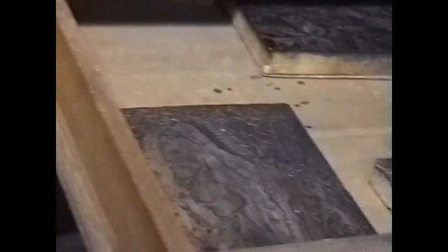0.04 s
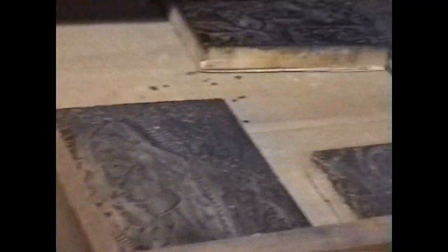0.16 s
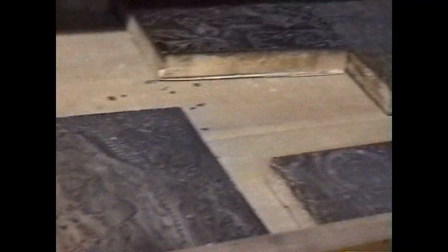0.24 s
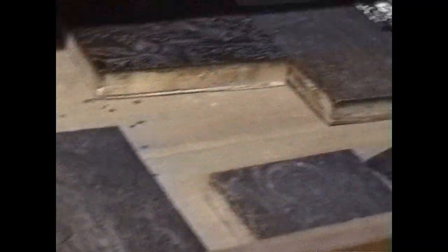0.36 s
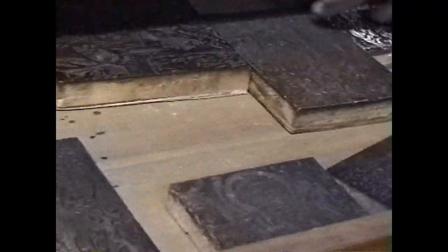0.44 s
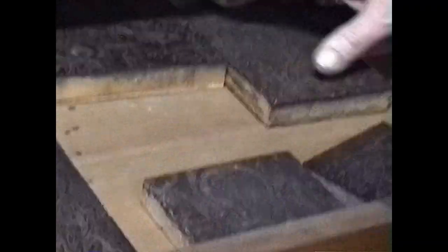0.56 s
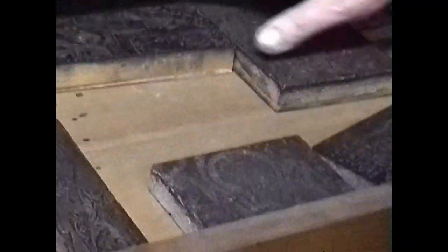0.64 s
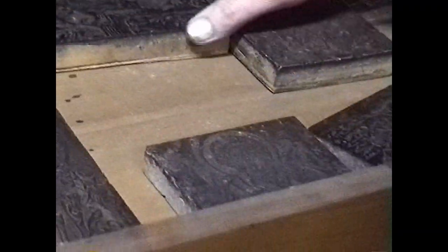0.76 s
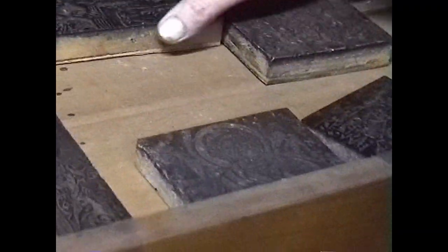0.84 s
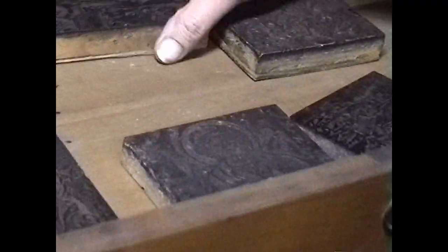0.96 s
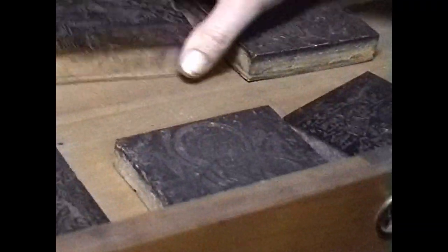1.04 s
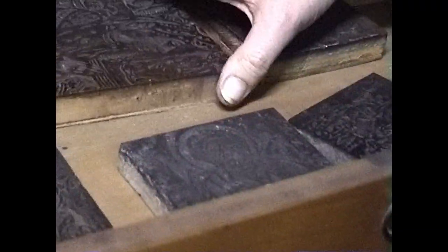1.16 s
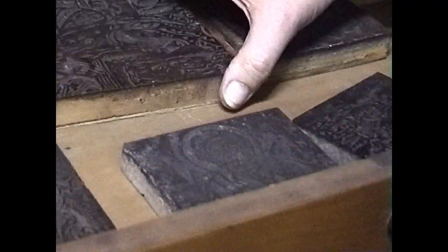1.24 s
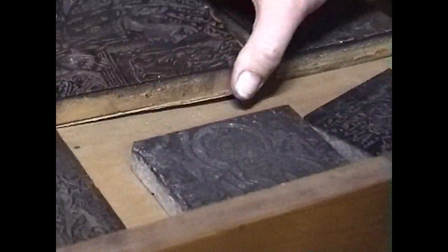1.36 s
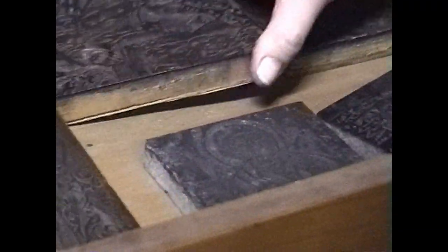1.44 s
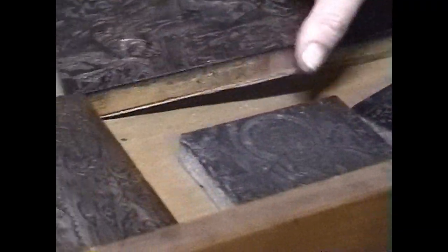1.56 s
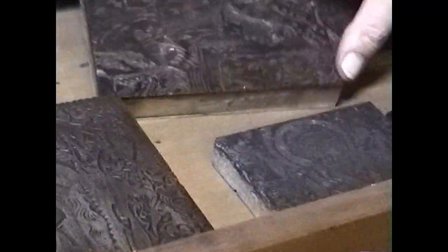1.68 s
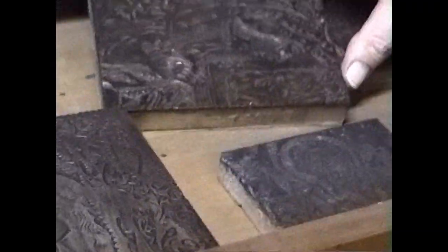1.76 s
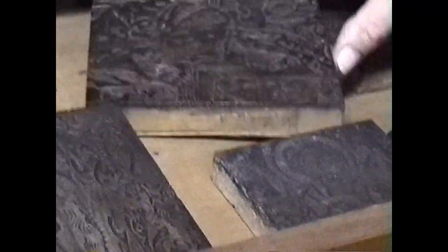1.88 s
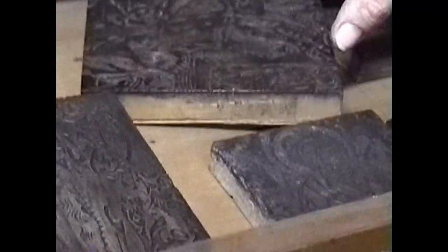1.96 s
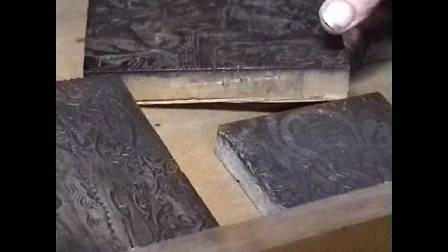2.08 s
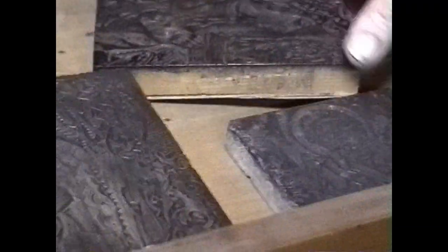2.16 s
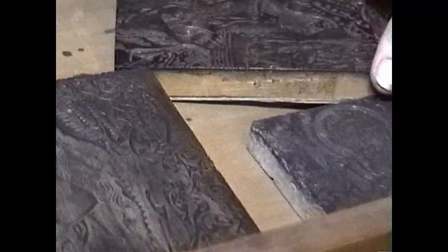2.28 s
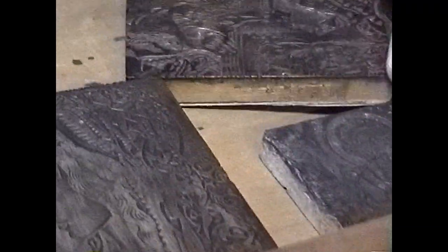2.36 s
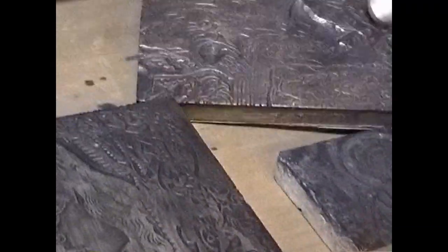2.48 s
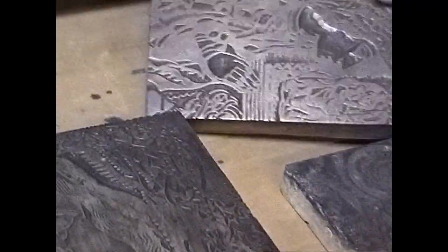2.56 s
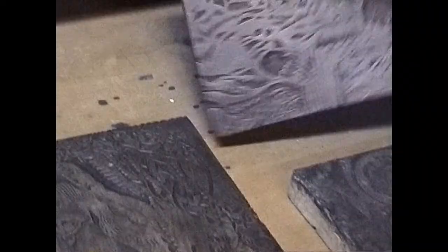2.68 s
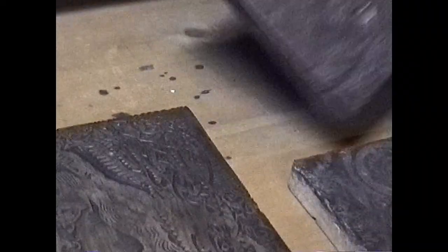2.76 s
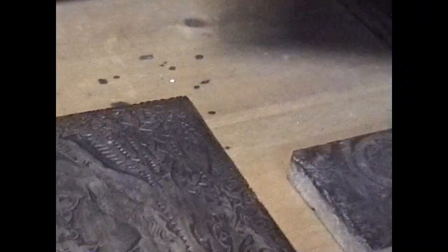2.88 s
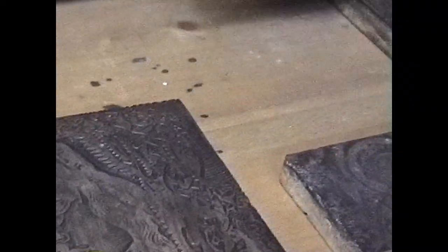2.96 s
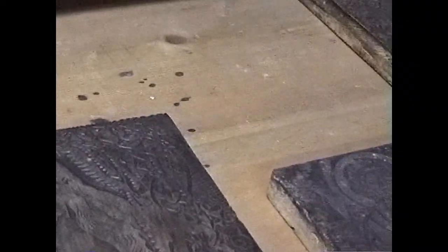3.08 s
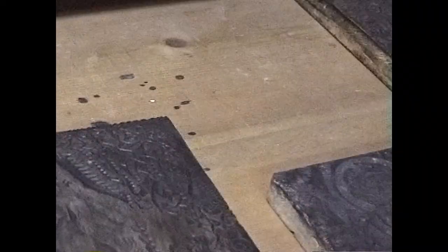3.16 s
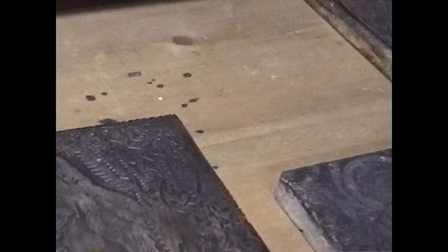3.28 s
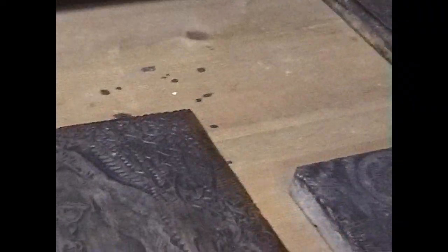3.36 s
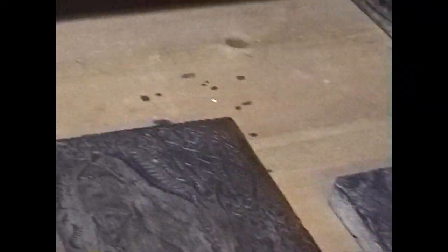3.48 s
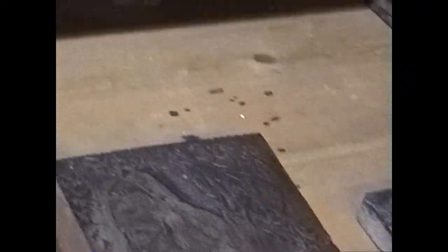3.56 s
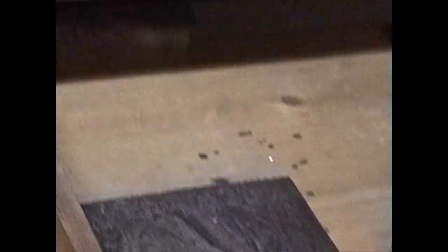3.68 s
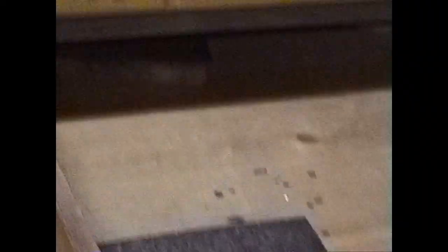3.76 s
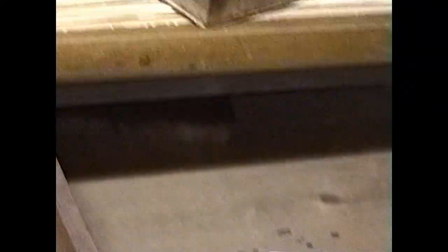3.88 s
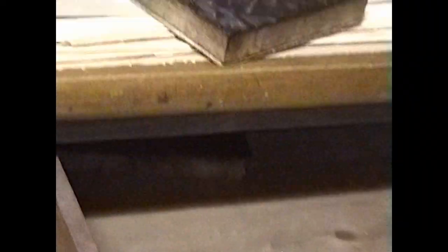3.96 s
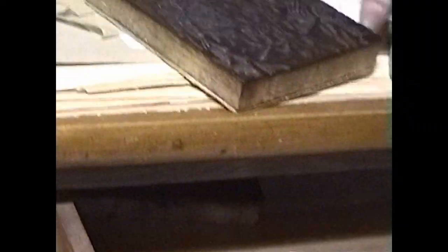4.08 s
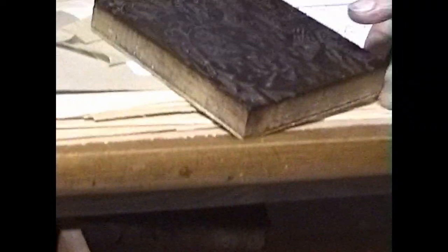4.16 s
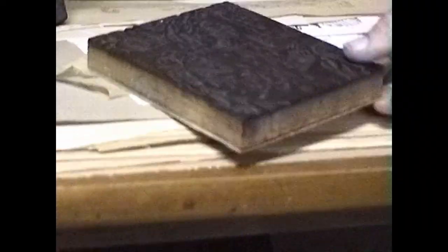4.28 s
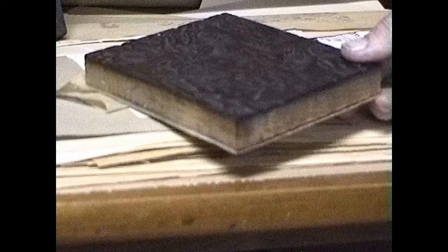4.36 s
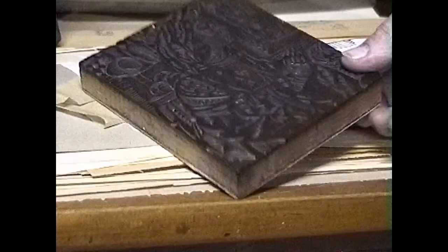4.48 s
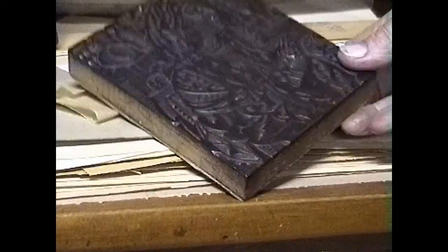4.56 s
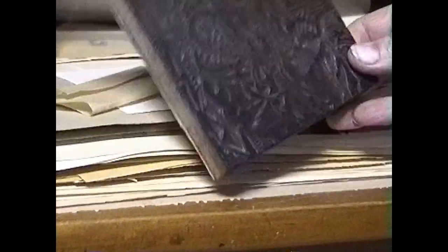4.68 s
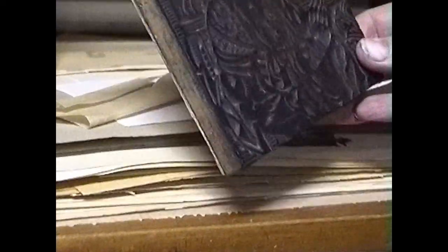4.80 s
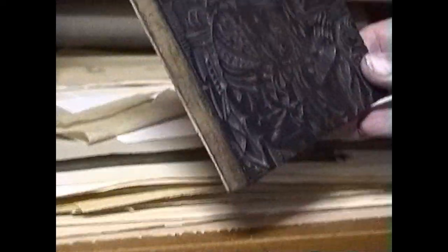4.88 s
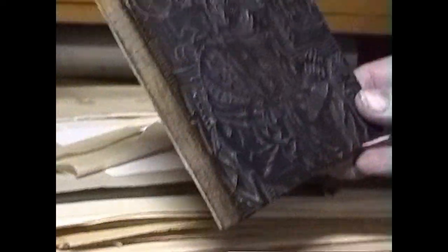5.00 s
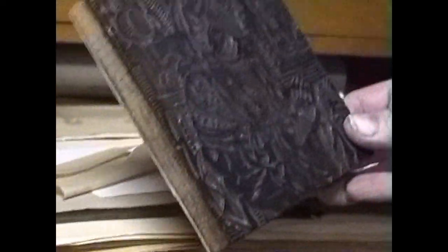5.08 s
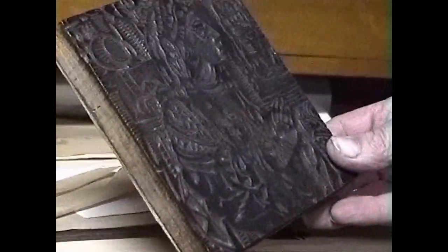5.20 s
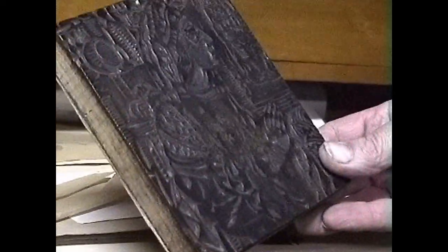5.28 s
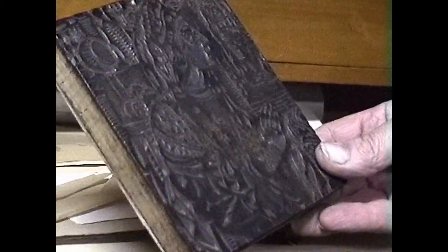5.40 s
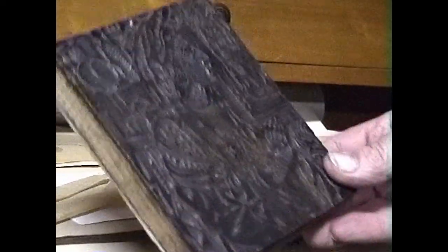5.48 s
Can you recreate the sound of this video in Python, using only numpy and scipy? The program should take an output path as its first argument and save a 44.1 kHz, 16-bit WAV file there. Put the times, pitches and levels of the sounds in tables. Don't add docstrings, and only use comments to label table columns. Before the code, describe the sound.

Close to a camcorder in a small, short-decaying room, heavy wooden blocks are moved in a shallow drawer: a tight opening clatter, small taps, a strong gritty push, a second clatter with hollow knocks, separate clacks, then airy brushing and light ticks. A block lands softly near the end, leaving faint rubbing, steady hiss and slight electrical buzz.

```python
import sys
import numpy as np
from scipy import signal
from scipy.fft import rfft, irfft, next_fast_len
from scipy.io import wavfile
from scipy.ndimage import uniform_filter1d, map_coordinates

SR = 44100
rng = np.random.default_rng(int(sys.argv[2]) if len(sys.argv) > 2 else 0)


def natural_amplitude(level_db):
    exponent = np.asarray(level_db, float) / 20
    return 10 ** exponent


def log_audio(samples):
    frames = np.atleast_2d(samples).T
    limited = np.clip(frames, -1, 1)
    pcm = np.round(limited * 32767).astype(np.int16)
    wavfile.write(sys.argv[1], SR, pcm)


N = 244049

# (time [s], ring level [dB],
# landing place [0 drawer box, 1 drawer floor, 2 block body, 3 block edge],
# time until hand or load has damped 60 dB [s], crack level [dB])
KNOCK_EVENTS = [(0.016, -6.5, 3, 0.34, -14), (0.035, -6.5, -0.02, 0.06, -14), (0.039, -11.5, 3, 0.8, -17),
                (0.054, -3, 0.77, 0.04, -16), (0.065, -9.5, 3, .04, -16), (0.078, -14.5, 1.84, -0.3, -45),
                (0.096, -16, 1.78, 0.2, -41), (1.11, -21, 1.05, .12, -45), (1.163, -7.5, 3, 0, -17),
                (1.275, -24.5, 1.76, 0.2, -42), (1.712, -6, 1.05, .45, -23), (1.7225, -12, 2.05, .25, -21),
                (1.7434, -10, 1.05, .13, -33), (1.799, -22, 1.2, -1.3, -46),
                (1.871, -4.5, 1.13, 0.5, -13.5), (1.886, -18, 1.5, -0.93, -21), (1.904, -12.5, 2.3, 0, -30),
                (1.92, -10, -0.16, .4, -20.5), (1.934, -13, 2.5, 0.06, -21.5),
                (1.964, -23, 3.2, -0.44, -48), (2.301, -21, 2.5, 0.9, -35.5), (2.429, -14, 2.13, 0.5, -26),
                (2.473, -9, 3.5, -0.9, -17.5), (2.63, -27.5, 1.55, 0.5, -36)]
# (frequency [Hz], level [dB], T60 [s])
WOOD_MODES = [(102, -14.5, 0.29), (157.6, -1.5, 0.36), (214, -3.5, 0.26), (245.4, -7.5, 0.31),
              (286, 3.5, 0.13), (336, -10.5, 0.38), (400, -10.5, 0.12), (434, -0.5, 0.15),
              (481, -2.5, 0.11), (569, 0.5, 0.047), (646.6, 0, 0.085), (702, -3, 0.053), (809, -0.5, 0.053),
              (907, -4.5, 0.058), (998, -3, 0.054), (1116, -2.5, 0.036), (1328, -1, 0.03),
              (1500, -1.5, 0.034), (1626, -5, 0.048), (1810, -8, 0.032), (2004, -6.5, 0.033),
              (2400, -13.5, 0.055), (2843, -13, 0.051), (3300, -21.5, 0.011)]


def unit(x):
    return x / np.sqrt(np.mean(x ** 2) + 1e-20)


def along(points, hz):
    f, v = np.transpose(points)
    return np.interp(np.log(hz + 1), np.log(f + 1), v)


def filtered(x, response):
    m = next_fast_len(x.shape[-1] + 8192)
    hz = np.fft.rfftfreq(m, 1 / SR)
    return irfft(rfft(x, m) * response(hz), m)[..., :x.shape[-1]]


def wobble(rate):
    knots = rng.standard_normal(int(N * rate / SR) + 4)
    return map_coordinates(knots, [np.arange(N) * rate / SR])


def sides(db):
    return natural_amplitude(np.array([db / 2, -db / 2]))


def noise(shape, alike, patchy_db):
    z = signal.stft(rng.standard_normal((2, N)), nperseg=256)[2]
    field = uniform_filter1d(rng.standard_normal(z.shape[1:]), size=4, axis=0)
    field = uniform_filter1d(field, size=8, axis=1)
    pair = signal.istft(z * natural_amplitude(patchy_db * unit(field)), nperseg=256)[1][:, :N]

    def mid_side(hz):
        likeness = np.clip(along(alike, hz), -.8, 1)
        return shape(hz) * [np.ones_like(hz), np.tan(np.arccos(likeness) / 2)]

    mid, side = filtered(pair, mid_side)
    return np.array([mid + side, mid - side]) / np.std(mid)


def ringing(modes, t):
    hz, db, t60 = np.transpose(modes)[:, :, None]
    return hz[:, 0], natural_amplitude(db - 60 * t / t60) * np.exp(2j * np.pi * hz * t)


def camcorder():
    # (frequency [Hz], density [dB per Hz])
    hiss_shape = [(12, -20), (20, 7), (88, -9.5), (189, -7), (223, -18), (278, -8), (706, -11), (766, -17),
                  (903, -12), (1360, -16), (3020, -18), (3560, -19.5), (14000, -26.5)]
    # (frequency [Hz], left-right likeness [-1 to 1])
    hiss_alike = [(60, -0.48), (240, -1.5), (950, -0.3), (3770, 0.15), (15000, 0.18)]
    # (multiple of the mains [1], rms level [dB])
    buzz_harmonics = [(3, -72), (4, -70), (5, -70), (8, -72), (18, -68), (20, -70), (21, -75), (22, -71),
                      (24, -75), (26, -69), (30, -76), (32, -78), (40, -78), (42, -79)]
    mains_hz, hiss_db = 50, -55.5
    t = np.arange(N) / SR
    buzz = sum(natural_amplitude(db + 2) * np.sin(2 * np.pi * (k * mains_hz * t + rng.random()))
               for k, db in buzz_harmonics)
    hiss = noise(lambda hz: natural_amplitude(along(hiss_shape, hz)), hiss_alike, patchy_db=0.5)
    return natural_amplitude(hiss_db) * hiss + natural_amplitude(-2.5) * buzz


def room(x):
    # (frequency [Hz], T60 [s])
    room_decay = [(60, 0.65), (200, 0.48), (600, 0.47), (1500, 0.23), (5000, 0.15), (12000, 0.32)]
    out, step = np.zeros((2, N + SR)), SR // 3
    for start in range(0, N, step):
        hz, t, z = signal.stft(rng.standard_normal((2, SR // 2)), SR, nperseg=256)
        z = z + 1.25 * z.mean(axis=0)
        decay = natural_amplitude(-60 * t / along(room_decay, hz)[:, None])
        tail = signal.istft(z * decay, SR, nperseg=256)[1]
        wet = signal.fftconvolve(x[:, start:start + step], tail / np.linalg.norm(tail[0]), axes=1)
        out[:, start + 300:][:, :wet.shape[1]] += wet
    return out[:, :N]


def jolts():
    # (time [s], peak level [dB])
    jolt_events = [
        (.69, -47),
        (1.712, -45),
        (2.63, -44),
        (3.305, -40),
        (3.85, -50.5),
    ]
    swing_hz, t60, rise_s = 64.7, 0.24, 0.013
    out, t = np.zeros(N + SR), np.arange(SR // 3) / SR
    envelope = natural_amplitude(-60 * t / t60) * (1 - np.exp(-t / rise_s)) ** 2
    swing = envelope * np.sin(2 * np.pi * swing_hz * t)
    for s, db in jolt_events:
        out[round(s * SR):][:len(t)] += natural_amplitude(db + 4) * swing
    return out[:N]


def whistles():
    # (time [s], length [s], frequency [Hz], width [Hz], level [dB])
    whistle_events = [
        (0.734, 0.13, 10800, 1500, -47.5),
        (1.44, 0.046, 2000, 200, -52),
        (2.034, 0.047, 4570, 503, -45.5),
        (2.5, 0.012, 4900, 300, -36),
        (2.498, 0.011, 6000, 300, -34.5),
        (3.678, 0.088, 2800, 400, -49),
        (4.73, 0.0099, 2240, 200, -48.5),
        (4.86, 0.34, 2950, 200, -63.5),
    ]
    out = np.zeros(N)
    for s, length, hz, width_hz, db in whistle_events:
        n = round(length * SR)
        band = filtered(rng.standard_normal(SR // 2), lambda f: np.exp(-((f - hz) / width_hz) ** 2))
        out[round(s * SR):][:n] += natural_amplitude(db) * unit(band)[:n] * np.sqrt(np.hanning(n))
    return out


def wood(hz):
    response = 0
    for k, (centre, db, t60) in enumerate(WOOD_MODES):
        width = 3.7 * np.log(1000) / np.pi / t60
        sign = (-1) ** k
        response = response + sign * natural_amplitude(db) * 1j * hz * width / (centre * centre - hz * hz + 1j * hz * width)
    return response


def snags(rate, spread_db):
    sizes = (rng.random(N) < rate / SR) * natural_amplitude(spread_db * rng.exponential(size=N))
    return unit(6.4 + signal.lfilter([1], [1, -np.exp(-1 / (0.0007 * SR))], sizes))


def pressure():
    # (time of full pressure [s], time to rise 20 dB [s], time to fall 20 dB [s],
    # rasp level [dB], fine hiss over rasp [dB])
    stroke_events = [(.07, 0.45, .15, -40, -12), (.72, 0.27, 0.8, -57, 1), (.81, 0.47, 0.7, -51, -2),
                     (1.271, -0.3, 0.3, -45, -4.5), (1.454, 0.16, 0.12, -49, -1.5),
                     (1.725, .06, 0.19, -41, -12), (1.851, 0.2, 0.01, -42, 1.5),
                     (1.869, 0.09, 0.1735, -35, -12), (2.06, .08, .03, -54, 8),
                     (2.27, .15, .04, -45.5, -2.5), (2.335, 2, -0.2, -56.5, -9),
                     (2.422, 0.09, 0.06, -39, -4.5), (2.687, 0.4, 0.01, -43, -8),
                     (2.793, 0.13, 0.17, -49.5, 8), (3.2, 0.9, 0.1, -58.5, -4.5),
                     (3.284, 0.08, 0.14, -52, -4), (3.488, 0.18, 0.36, -49.5, -5.5),
                     (3.725, 0.12, 0.1, -49.5, 1.5), (3.78, 0.03, 0.0851, -40.5, 2),
                     (4.08, .035, .16, -50, 3), (4.18, 0.3, 0.1, -58, 4.5), (4.291, .09, 0.12, -50.5, 7),
                     (4.42, 0.2, 0.21, -58.5, 12.5), (4.57, 0.38, 0.04, -52.5, 6.5)]
    # (time [s], rasp level [dB])
    push_curve = [
        (.88, -76),
        (.924, -61),
        (.966, -34),
        (1.048, -27),
        (1.08, -29.5),
        (1.155, -31),
        (1.184, -37.5),
        (1.252, -64),
        (1.3, -80),
    ]
    push_fine_db, push_drag_db, push_drag_growth = -4, -7, 68
    drag_db, drag_lighter = -3, 0.59
    drag_lag_s, drag_rest_db = 0.029, -61.5
    t = np.arange(N) / SR
    push = natural_amplitude(np.interp(t, *np.transpose(push_curve)))
    grows_db = push_drag_growth * np.clip(t - push_curve[3][0], -.3, .05)
    power = (push * natural_amplitude([0 * t, 0 * t + push_fine_db, push_drag_db + grows_db])) ** 2
    for s, rise, fall, db, fine_db in stroke_events:
        near = slice(max(round((s - 3 * rise) * SR), 0), round((s + 3 * fall) * SR))
        stroke = natural_amplitude(db - 20 * np.maximum((s - t[near]) / rise, (t[near] - s) / fall))
        balance_db = np.array([[0], [fine_db], [drag_db - drag_lighter * fine_db]])
        power[:, near] += (stroke * natural_amplitude(balance_db)) ** 2
    rasp, fine, drag = power
    keep = np.exp(-1 / (drag_lag_s * SR))
    drag = signal.lfilter([1 - keep], [1, -keep], drag) + natural_amplitude(drag_rest_db) ** 2
    return np.sqrt([rasp, fine, drag])


def sliding():
    # (frequency [Hz], density [dB per Hz])
    rasp_shape = [(500, -34), (900, -2.5), (1500, 1.5), (2800, 0), (4500, -2.5), (6500, -10.5), (9000, -25)]
    # (frequency [Hz], density [dB per Hz])
    fine_shape = [(3000, -8), (5500, -4), (8000, -2), (10500, -2.5), (12500, -8.5), (15500, -11)]
    rasp_gain, fine_gain, drag_gain = pressure()
    catch = snags(500, spread_db=2.5)
    rasp = noise(lambda hz: natural_amplitude(along(rasp_shape, hz)), [(1000, 0.87)], patchy_db=3.5)
    fine = noise(lambda hz: natural_amplitude(along(fine_shape, hz)), [(6000, 0.71), (14000, 0.24)], patchy_db=2.0)
    rumble = noise(wood, [(300, 0.81)], patchy_db=2.5)
    rasp = rasp_gain * natural_amplitude(-1.8 + 1.1 * wobble(40)) * rasp
    fine = fine_gain * natural_amplitude(0.15 + 2.43 * wobble(40)) * fine
    hiss = sides(-0.2)[:, None] * catch * (rasp + fine)
    return hiss + drag_gain * natural_amplitude(2.56 * wobble(24.88)) * rumble


def thud():
    # (time [s], level [dB], build-up time [s])
    touches = [
        (4.516, -13, 0.0052),
        (4.519, -7.5, 0.0026),
        (4.5265, -16, 0.00093),
    ]
    # (frequency [Hz], level [dB], T60 [s])
    ledge_modes = [(63.5, -29.5, 0.32), (149.3, -17.5, 0.22), (185, -12.5, 0.26), (254.2, 5, 0.045),
                   (303, 0.5, 0.05), (410, -30, 0.019), (445.5, 2, 0.11), (500, -5.5, 0.023),
                   (577, 1.5, 0.032), (599, -1, 0.025), (750, -8, 0.034), (870, -23, 0.067),
                   (1368, -11.5, 0.023), (1676, -21, 0.026), (2000, -25, 0.026), (2420, -25, 0.027)]
    out, t = np.zeros((2, N + SR)), np.arange(SR // 3) / SR
    hz, rings = ringing(ledge_modes, t)
    for s, db, rise in touches:
        port = rng.standard_normal(len(hz))
        gain = natural_amplitude(db) * sides(-4.5 + 1.3 * port) * np.exp(.15j * np.outer([1, -1], port))
        out[:, round(s * SR):][:, :len(t)] += (gain @ rings).imag * (1 - np.exp(-t / rise)) ** 2
    return out[:, :N]


def ticks():
    # (time [s], peak level [dB], level of the top band [dB])
    grit_events = [(0.0249, -16.5, -11.5), (1.1942, -33, -18), (1.2695, -23, -10.5), (1.734, -28.5, -29),
                   (2.4675, -23, -18), (2.5033, -26, -6), (2.688, -46, -23), (3.2782, -42, -11),
                   (3.471, -39, -4), (3.757, -32.5, -10), (3.778, -27, -2), (3.7825, -39, -5),
                   (3.8544, -44.5, 3.5), (4.3874, -47, -3), (4.4014, -40, 3), (4.4197, -36.5, 5.5),
                   (4.427, -40, -9)]
    crack_late_s, crack_top_db, crack_t60, grit_t60 = .0008, -21.5, 0.037, 0.027
    out, t = np.zeros((2, N + SR)), np.arange(SR // 20) / SR
    cracks = [(row[0] + crack_late_s, row[4], crack_top_db, crack_t60) for row in KNOCK_EVENTS]
    cracks += [(*row, grit_t60) for row in grit_events]
    for s, db, top_db, t60 in cracks:
        decay = natural_amplitude(-60 * t / t60) + 0.45 * natural_amplitude(-60 * t / 0.0013)
        burst = rng.standard_normal(len(t)) * natural_amplitude(db + 2) * decay
        colour = [(800, -3.5), (2000, 3.0), (5500, -5.5), (9000, top_db + 1.5), (15000, top_db - 7)]
        burst = filtered(burst, lambda hz: natural_amplitude(along(colour, hz)))
        out[:, round((s + .0005) * SR):][:, :len(t)] += sides(-4)[:, None] * burst
    return out[:, :N]


def knocks():
    # (time [s], ring level [dB], landing place [0-3])
    tap_events = [(.388, -42.5, 2.2), (0.534, -40.5, 1.25), (.651, -43, 1.1), (0.683, -35, 0),
                  (.715, -36, 2.4), (.919, -34.5, 1.1), (.971, -33, 2.6), (1.191, -47, -2),
                  (1.349, -32, 0.9), (1.44, -34, 0.3), (1.529, -43, 0.9), (2.324, -28.5, 1.2),
                  (2.479, -11, 2.65), (2.502, -36, -0.5), (2.653, -26, 1.1), (2.683, -38.5, 0.6),
                  (3.282, -37, 2.1), (3.3, -24, -0.2), (3.34, -27.5, -1), (3.925, -41.5, 2.4),
                  (3.846, -26.5, 0.13), (3.885, -33.5, 0), (4.288, -41, 1), (4.315, -60, 4.5),
                  (4.397, -56, 1.5)]
    part_centres = [170, 290, 600, 1400]
    # (frequency [Hz], left-right level [dB])
    port_lean = [(60, -1), (240, -4), (950, 0.5), (3770, 6), (15000, -0.5)]
    away_db, far_db, edge_db = -8, -14.5, -5
    tap_damped_s, tap_edge_db = 0.11, -8
    out, t = np.zeros((2, N + SR)), np.arange(SR // 3) / SR
    hz, rings = ringing(WOOD_MODES, t)
    drawer = hz < 360
    part = along(list(zip(part_centres, range(len(part_centres)))), hz)
    blows = [(*row[:4], edge_db) for row in KNOCK_EVENTS]
    blows += [(*row, tap_damped_s, edge_db + tap_edge_db) for row in tap_events]
    for s, db, place, damped, edge_loss_db in blows:
        size, turn, port = rng.standard_normal((3, len(hz)))
        reach_db = np.maximum(away_db * (part - place) ** 2, far_db)
        reach_db = reach_db + edge_loss_db * np.clip(part - 2, 0, 1)
        gain = natural_amplitude(db + 2.0 + reach_db + 2.6 * size) * np.exp(.8j * turn)
        gain = gain * sides(along(port_lean, hz) + 0.35 * port) * np.exp(.15j * np.outer([1, -1], port))
        rise = np.clip(0.00029 * natural_amplitude(-.6 * (reach_db[-1] - reach_db.max() - 7.5)), 1e-4, .006)
        fade_db = -60 * t / max(damped, .01)
        drawer_ring = ((gain * drawer) @ rings).imag * natural_amplitude(0.84 * fade_db)
        block_ring = ((gain * ~drawer) @ rings).imag * natural_amplitude(fade_db)
        build_up = 1 - np.exp(-t / rise)
        out[:, round((s + .0012) * SR):][:, :len(t)] += (drawer_ring + block_ring) * build_up
    bass_cut = signal.butter(4, 128, "highpass", fs=SR, output="sos")
    return signal.sosfilt(bass_cut, out[:, :N])


def scene():
    near = knocks() + thud() + ticks()
    return near + jolts() + whistles() + natural_amplitude(-7.0) * room(near) + sliding() + camcorder()


def top_cut(x):
    return signal.sosfilt(signal.butter(12, 16100, fs=SR, output="sos"), x)


def record(dry):
    band_edges = 14300, 15150
    keep = np.exp(-1 / (0.00084 * SR))
    loudness = np.sqrt(signal.lfilter([1 - keep], [1, -keep], np.max(dry ** 2, axis=0)))
    held = dry / (1 + (loudness / 0.46) ** 13.8) ** (1 / 5.6)
    full = held / (1 + np.abs(held / .8) ** 8) ** (1 / 8)
    low, wide = filtered(full, lambda hz: hz < np.array(band_edges)[:, None, None])
    top = wide - low
    busy = uniform_filter1d(np.mean(top ** 2, axis=0), size=1024) > natural_amplitude(-69.5) ** 2
    return top_cut(low + top * uniform_filter1d(busy * 1., size=1024))


dry = scene()
out = record(dry)
log_audio(out)
```